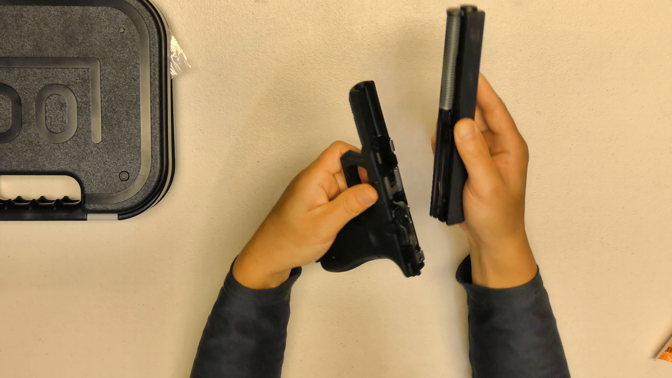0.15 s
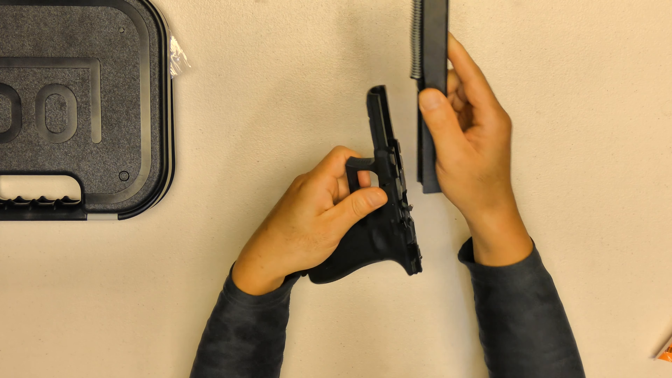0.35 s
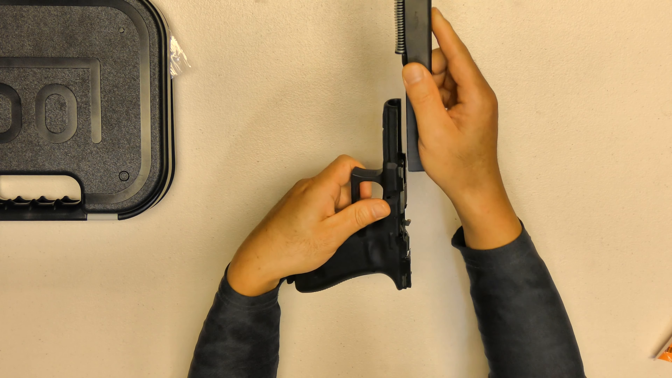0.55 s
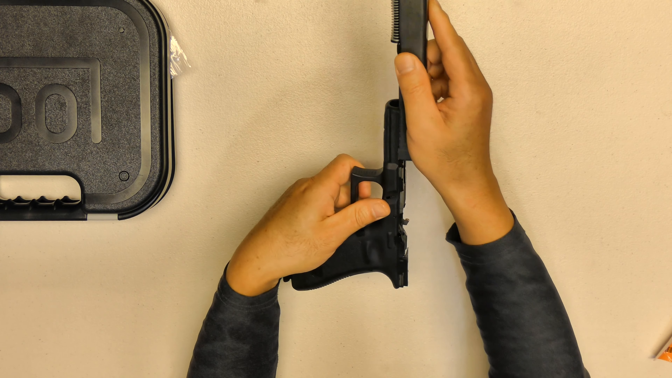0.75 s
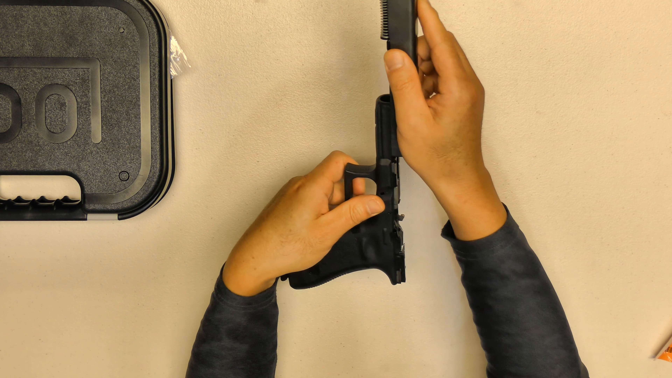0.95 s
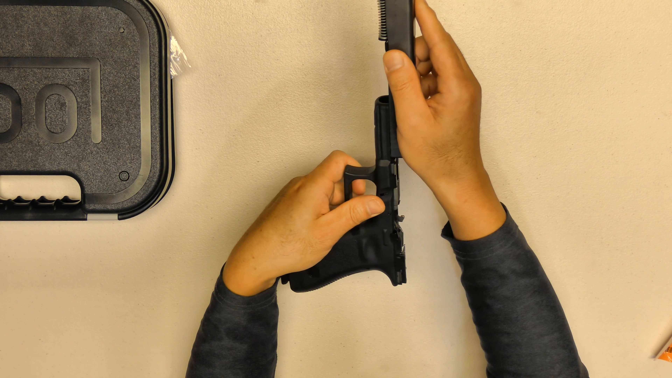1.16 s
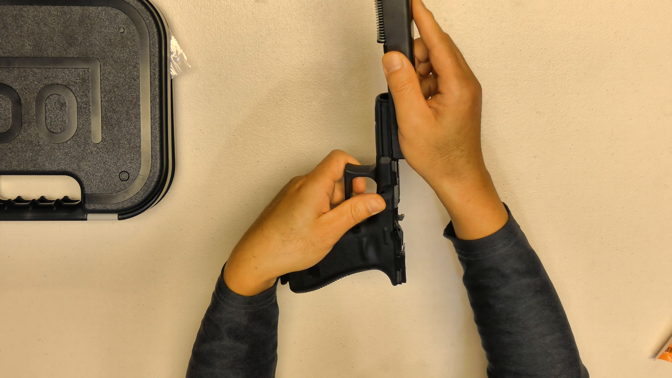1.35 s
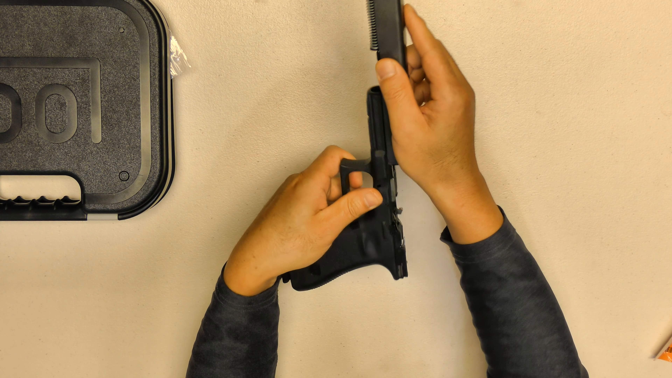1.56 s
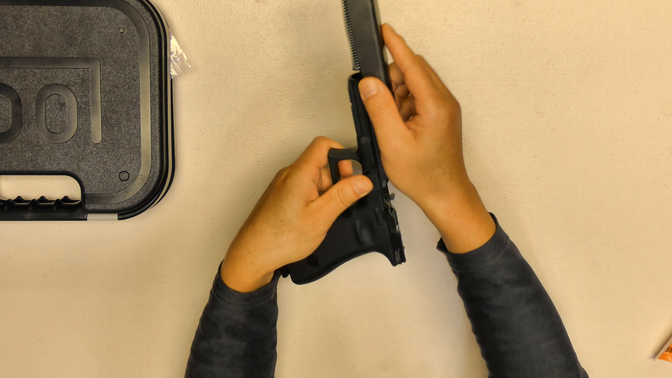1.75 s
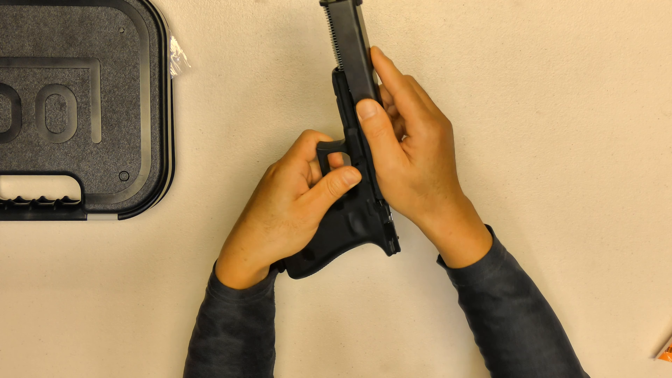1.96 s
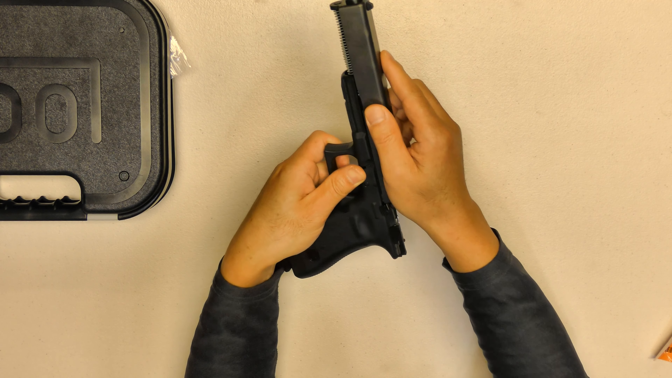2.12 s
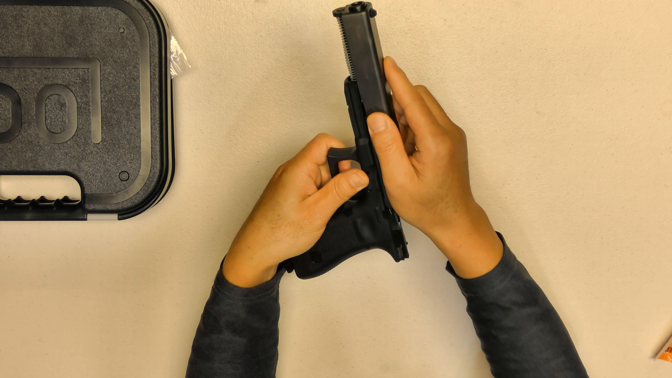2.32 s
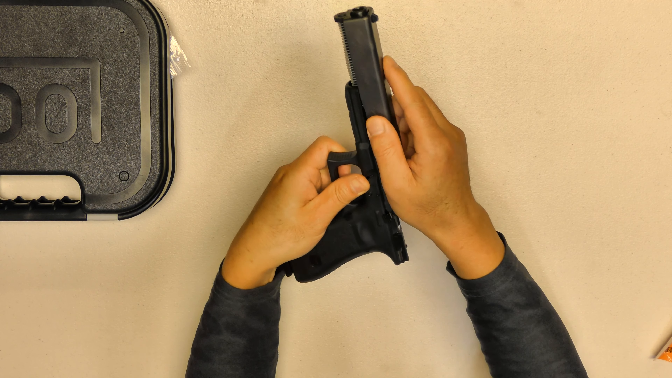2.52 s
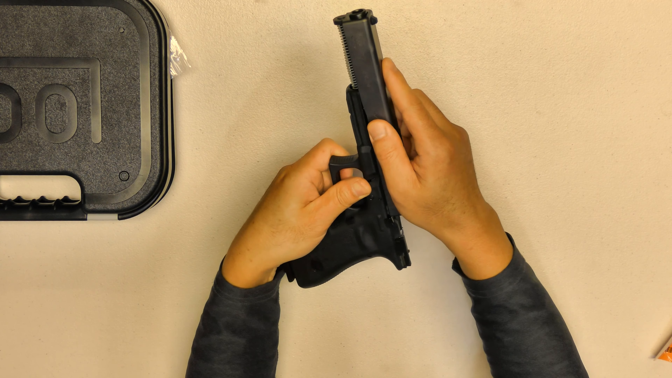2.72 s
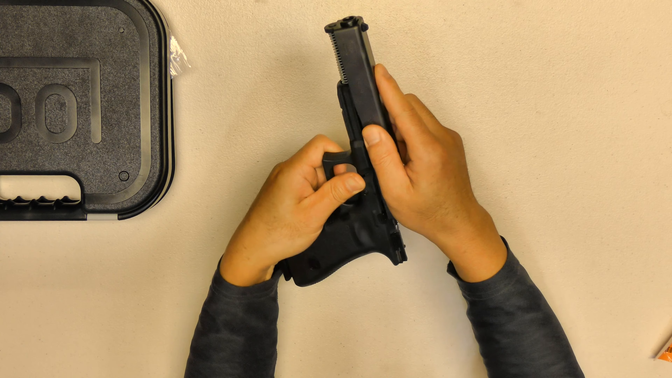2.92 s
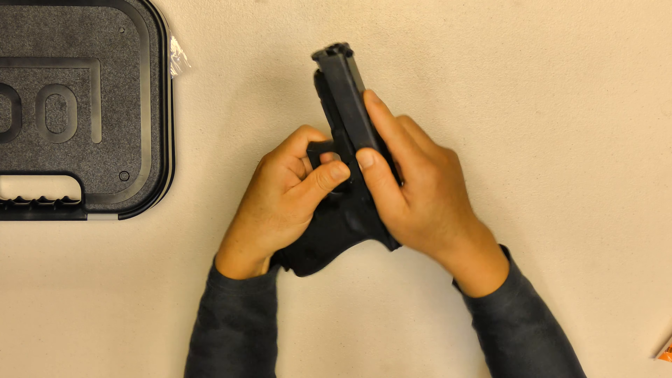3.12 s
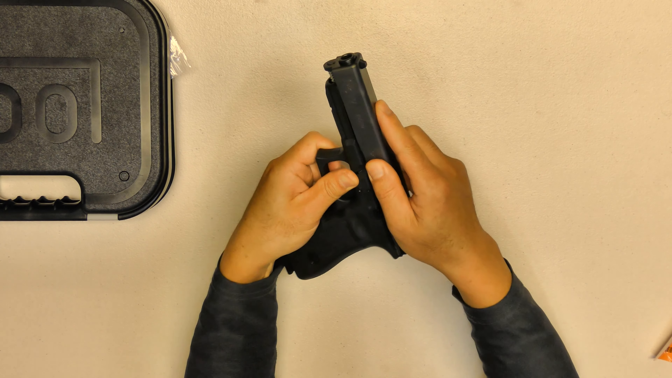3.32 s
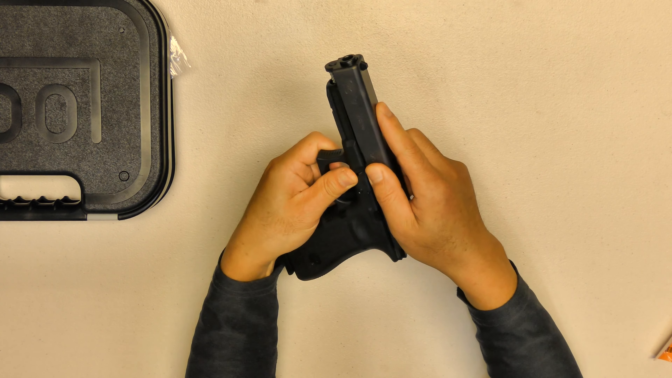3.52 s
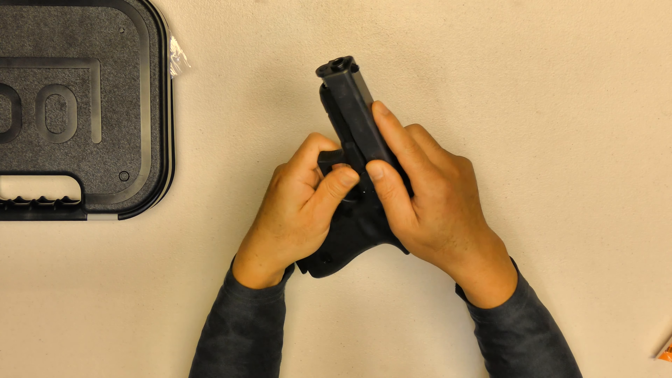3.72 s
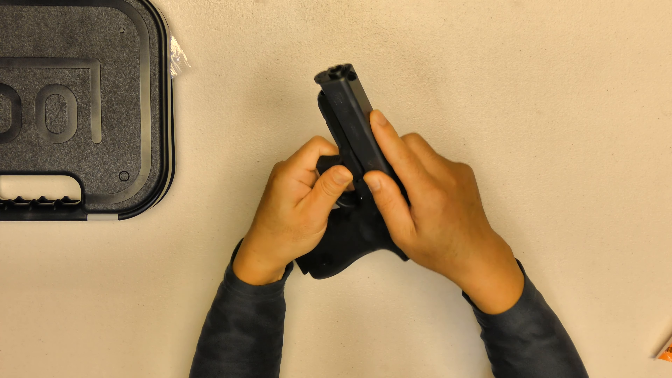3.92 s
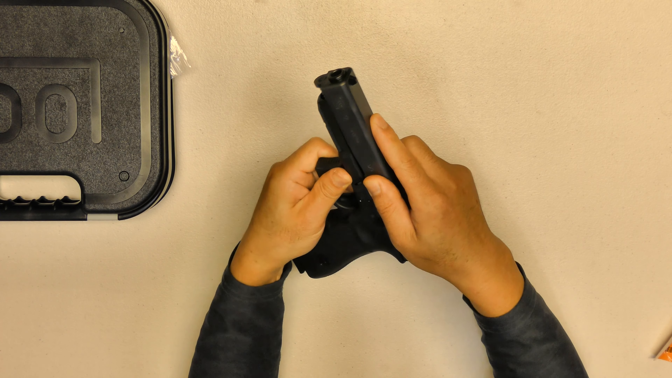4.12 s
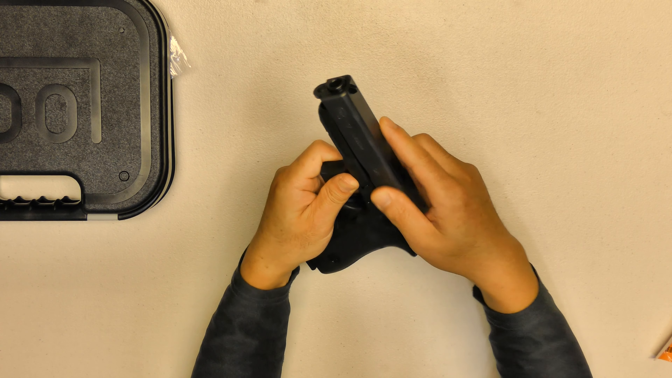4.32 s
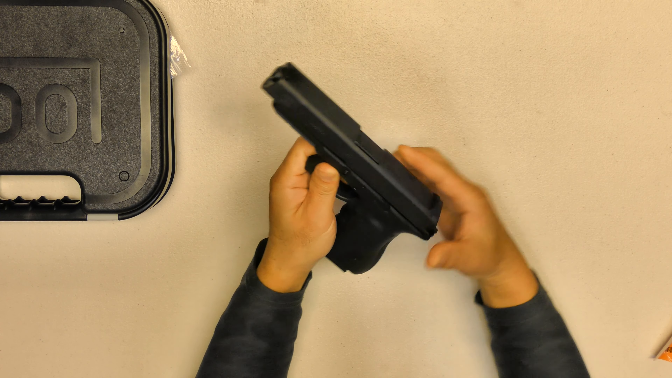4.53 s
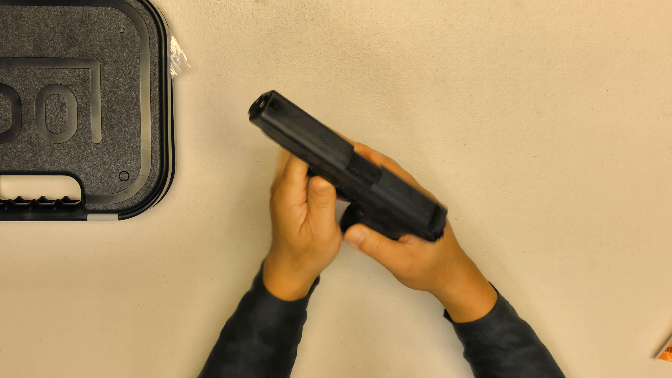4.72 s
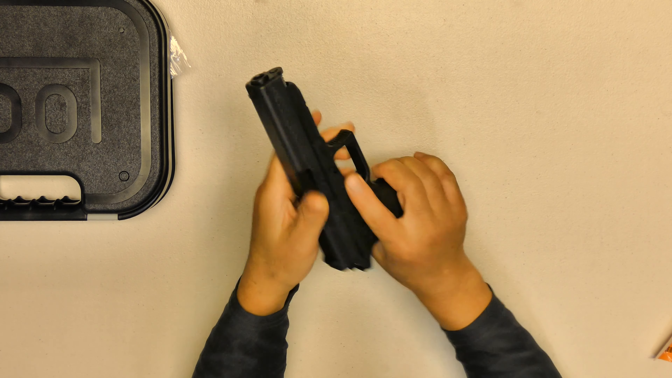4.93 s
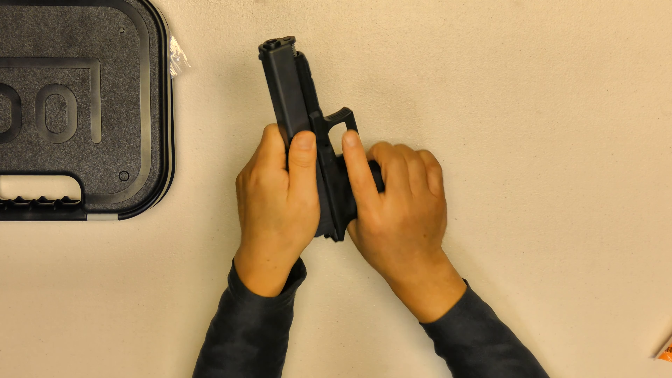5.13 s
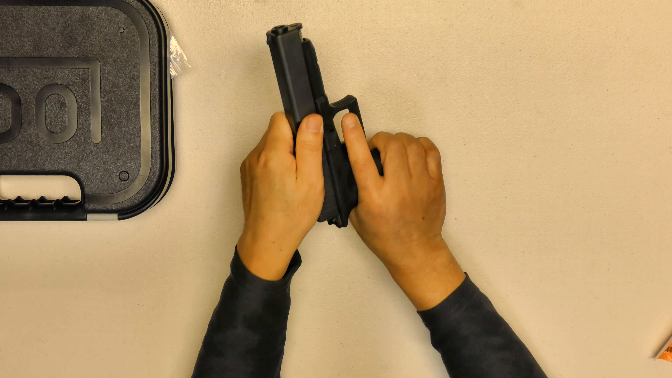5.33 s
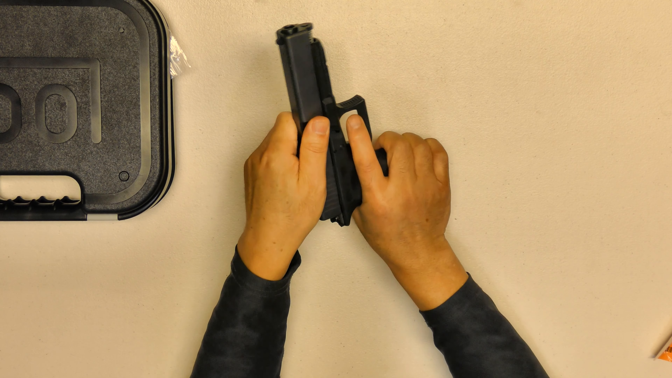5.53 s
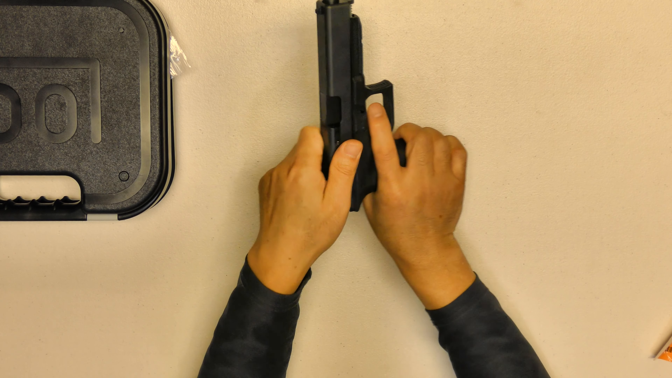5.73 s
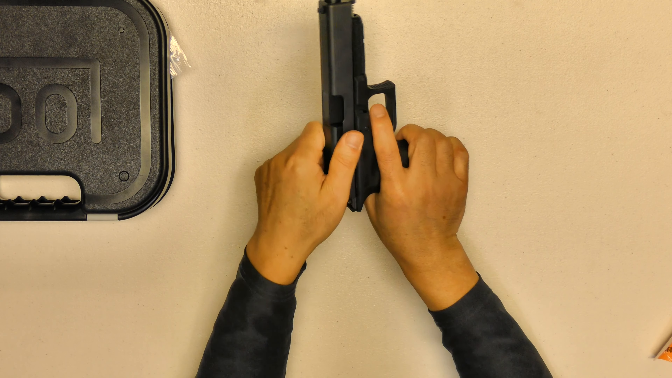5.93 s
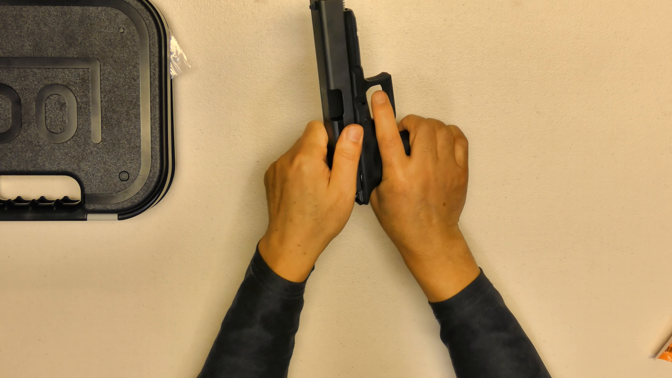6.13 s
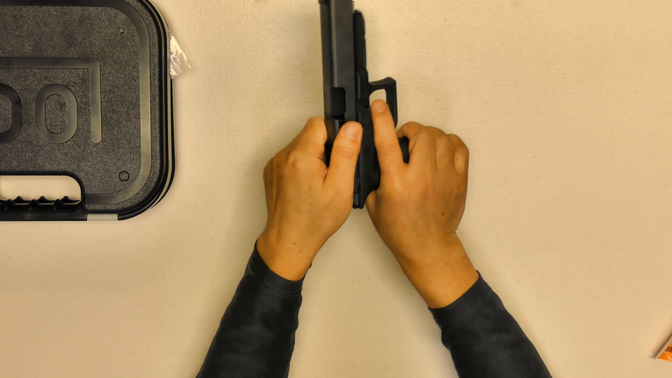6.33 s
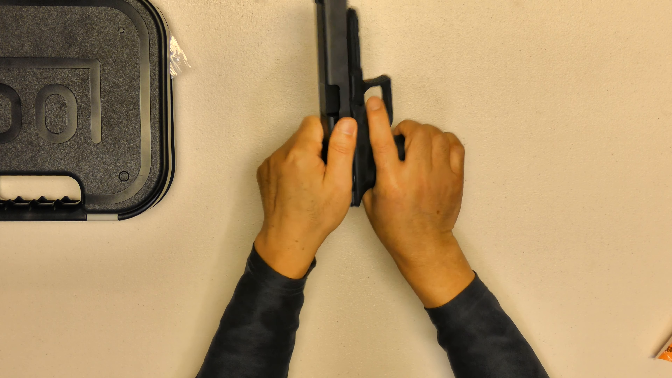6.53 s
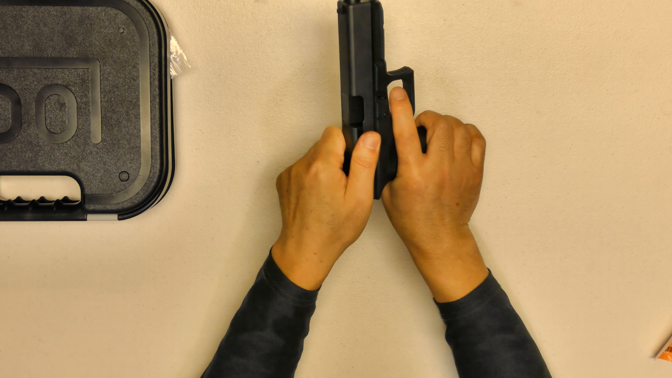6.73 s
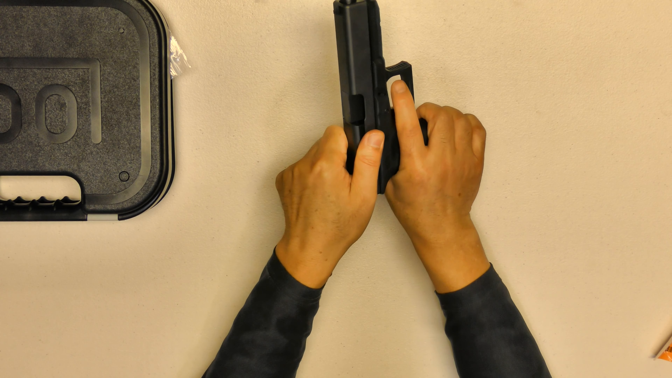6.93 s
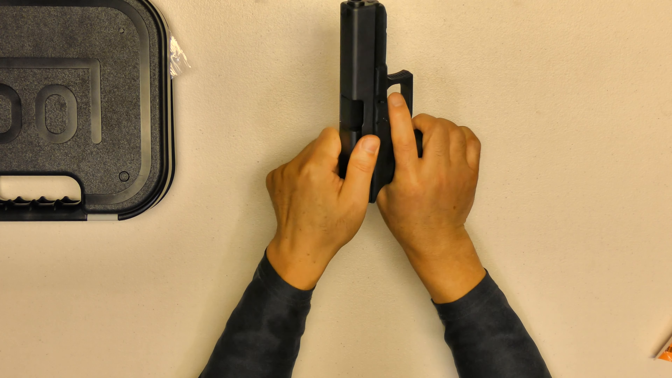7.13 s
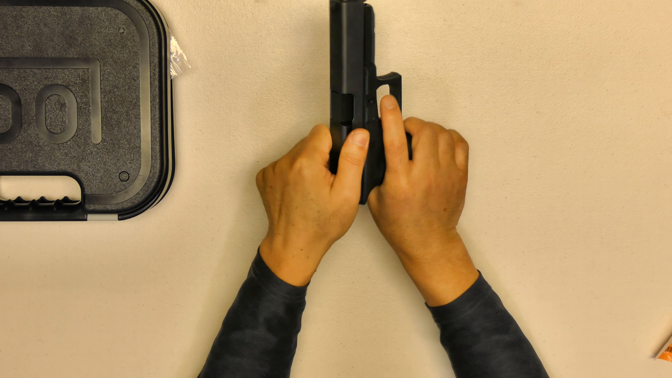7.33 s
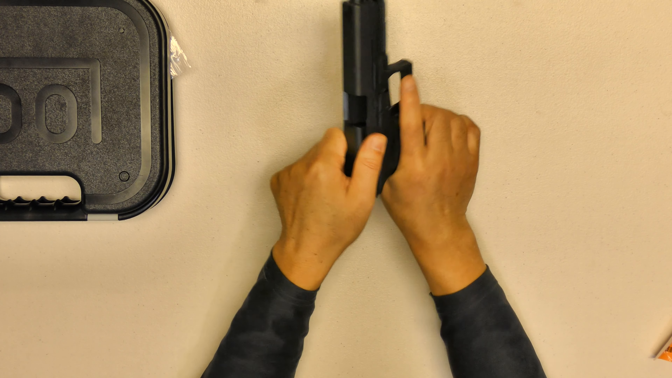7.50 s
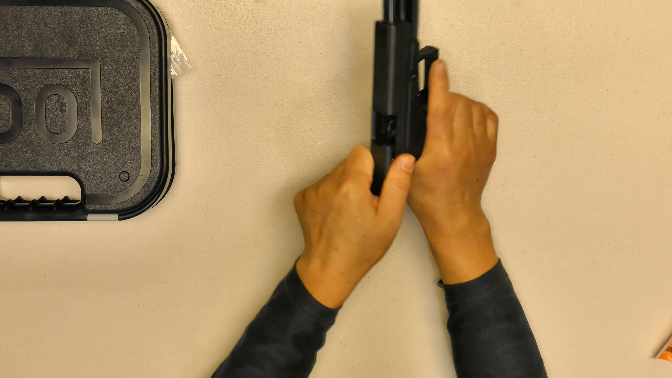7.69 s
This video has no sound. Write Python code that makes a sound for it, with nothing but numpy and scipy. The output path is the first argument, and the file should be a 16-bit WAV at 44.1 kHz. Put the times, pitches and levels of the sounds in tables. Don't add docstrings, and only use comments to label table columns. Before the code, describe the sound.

Pistol slide fitted onto its frame: small metallic clicks and scrapes, a loud double clack home, quiet handling, then two hard racking clacks in a room.

```python
import sys
import numpy as np
from scipy import signal
from scipy.fft import rfft, irfft
from scipy.io import wavfile
from scipy.ndimage import uniform_filter1d

SR = 44100
rng = np.random.default_rng(int(sys.argv[2]) if len(sys.argv) > 2 else 0)


def to_linear_factor(level_db):
    exponent = np.asarray(level_db, float) / 20
    return 10 ** exponent


def digitize_waveform(pressure):
    field = np.atleast_2d(pressure).T
    bounded = np.clip(field, -1, 1)
    quanta = np.round(bounded * 32767).astype(np.int16)
    wavfile.write(sys.argv[1], SR, quanta)


N = 342216

# pitch [Hz], width [Hz], level [dB].
STEEL_MODES = [(5690, 900, -5.5), (6810, 1000, -2.5), (7850, 1260, -3), (8750, 700, -1), (9600, 1300, -3.5),
               (10570, 570, -3), (11660, 2300, -4.5), (14800, 2600, -6.5)]
# frequency [Hz], likeness [-1 to 1].
HUSH_LIKENESS = [(60, 0.43), (180, 0.22), (550, 0.43), (1650, 0.428), (4970, 0.36), (7200, 0.76),
                 (11000, 0.82), (15000, 0.29)]


def evened(x):
    return x / np.sqrt(np.mean(x ** 2) + 1e-20)


def read(points, hz):
    f, value = np.transpose(points)
    return np.interp(np.log(hz + 1), np.log(f + 1), value)


def add(mix, s, sound):
    part = mix[round(s * SR):][:len(sound)]
    part += sound[:len(part)]


def ring(x, modes, extra_db=0., wide=0.6):
    out = np.zeros(len(x))
    changes = np.outer(extra_db * np.ones(len(modes)), [0, 0, 1])
    for k, (hz, width, db) in enumerate(modes + changes):
        r = np.exp(-np.pi * width * wide / SR)
        pole = [1, -2 * r * np.cos(2 * np.pi * hz / SR), r * r]
        out += (-1) ** k * to_linear_factor(db) * np.sqrt(1 - r) * signal.lfilter([1, 0, -1], pole, x)
    return out


def pair(magnitude, same, size):
    a, b, c, d = rng.standard_normal((magnitude.shape[1], magnitude.shape[0], 4)).T
    same = np.clip(same, -1, 1)[:, None]
    left, own = a + 1j * b, c + 1j * d
    z = np.array([left, same * left + np.sqrt(1 - same ** 2) * own])
    return signal.istft(z * magnitude, nperseg=size, noverlap=size * 3 // 4)[1]


def hush():
    # frequency [Hz], level [dB per Hz].
    hiss_colour = [(15, -53.5), (25, -19), (90, -3.5), (114, -3), (245, -6), (358, -11.5), (445, -13),
                   (584, -32), (1180, -17), (1280, -18), (1550, -19.5), (5720, -35.5), (12900, -25.5),
                   (15750, -28), (16050, -59.5)]
    hz = np.fft.rfftfreq(1024, 1 / SR)
    patches = rng.standard_normal((N // 256 + 5, 513)).T
    patches = evened(uniform_filter1d(uniform_filter1d(patches, 10, 0), 12, 1))
    colour = to_linear_factor(read(hiss_colour, hz)[:, None] + 0.81 * patches)
    return to_linear_factor(-63) * evened(pair(colour, read(HUSH_LIKENESS, hz), size=1024)[:, :N])


def rustle():
    # time [s], level [dB].
    busy = [(0.0, -63), (0.97, -62), (1.45, -64), (2.12, -54), (2.55, -71.5), (2.85, -62.5), (3.35, -56),
            (3.41, -48), (3.8, -61.5), (4.3, -63), (4.9, -62), (6.4, -64), (6.811, -53.5), (7.43, -63.5),
            (7.56, -54), (7.76, -62)]
    # frequency [Hz], level [dB per Hz].
    skin_colour = [(470, -29.5), (800, -7.5), (955, -15), (1120, -12.5), (1220, -8), (1620, -11),
                   (1890, -4), (2090, -14.5), (2260, -8), (3220, -13.5), (6000, -26.5), (7800, -57),
                   (13200, -120)]
    # pitch [Hz], width [Hz], level [dB].
    fan = [(967, 57, -9.5), (1784, 35, -4), (2200, 61, -6)]
    hz, frames = np.fft.rfftfreq(256, 1 / SR), N // 64 + 5
    flicker = evened(uniform_filter1d(rng.standard_normal(frames), 5))
    colour = to_linear_factor(read(skin_colour, hz)[:, None] + 2.0 * flicker)
    z = evened(pair(colour, read(HUSH_LIKENESS, hz), size=256)[:, :N])
    z += to_linear_factor(-6.5) * evened(ring(rng.standard_normal(N), fan))
    s, db = np.transpose(busy)
    return to_linear_factor(np.interp(np.arange(N) / SR, s, db) - 2.5) * z


def blows():
    # start [s], strength [dB], frame pitch [Hz], knock [dB].
    ticks = [(0.347, -46, 2730, -28), (0.634, -57.5, 1850, 2.5), (0.71, -40.5, 2340, -7),
             (0.997, -39, 2270, -11.5), (1.126, -44, 2200, -5.5), (1.402, -55, 2970, -14),
             (3.145, -53, 2460, -39), (3.8345, -51, 2000, -0.5), (3.854, -57.5, 2650, 2),
             (3.899, -62, 2070, 5.5), (4.385, -55.5, 2105, -13), (4.5351, -46, 2370, -26),
             (4.5742, -44.5, 2350, -17.5), (4.7, -46, 1930, -27), (4.866, -40, 2110, -15),
             (4.9371, -40.5, 2410, -34), (4.938, -42, 4400, -31), (4.81, -51, 3400, -25),
             (5.26, -52, 3000, -24.5), (5.332, -49.5, 2002, -3), (6.4106, -35, 2670, -11.5),
             (6.4668, -44, 2080, -11), (6.624, -34.5, 2650, -9), (7.15, -57.5, 1900, 8.5),
             (7.4834, -18, 3130, -25), (7.489, -28.5, 1900, 6), (7.6142, -20.5, 1830, 9)]
    # start [s], strength [dB], frame pitch [Hz], steel [dB], rattle [ms].
    fitting = [(0.852, -25.5, 2800, -14, 3.7), (1.2965, -41.5, 2470, -27, 5),
               (1.4245, -18.5, 3100, -16.5, 3.8), (1.5693, -18.5, 2630, -21, 3.4),
               (1.5767, -19.5, 2800, -13, 3.8), (1.589, -23.5, 2660, -18, 4.9),
               (1.688, -27.5, 2640, -14, 5.9), (1.879, -38.5, 2300, -25.5, 6.7), (1.918, -54, 2300, -19, 5),
               (1.941, -36, 2200, -10, 3.3), (2.026, -20, 3930, -3, 3.1), (2.0297, -16, 2000, -7, 4.4),
               (2.0388, -23, 2900, -8, 4.3), (2.0455, -20, 2800, -5, 3.7), (2.0503, -17.5, 2300, -17, 2.4),
               (2.0565, -26.5, 2590, -23.5, 3.9), (2.7301, -25.5, 2100, -24.5, 2.7),
               (2.8951, -43, 2210, -16.5, 6.9), (2.905, -35, 2300, -13, 3.3),
               (2.9133, -28, 2480, -4.5, 5.3), (2.9176, -26, 3600, -7.5, 3.6), (2.931, -34, 2300, -13, 2.9)]
    # start [s], strength [dB], frame pitch [Hz], steel [dB], rattle [ms].
    clacks = [(3.1725, -25.5, 2970, 2.5, 4.7), (3.177, -27, 2000, -14, 2.8), (3.1837, -18, 3330, -9, 13),
              (3.1952, -4, 2400, -7.5, 5.8), (3.2, -6, 2060, -14, 2.8), (3.2107, -17, 2470, 2, 6.6),
              (3.2167, -8.5, 2200, -16, 4.8), (3.2236, -3.5, 2530, 1, 2.8), (3.2262, -4, 2400, -7.5, 1.9),
              (3.236, -21.5, 3000, -11.5, 2.2), (4.415, -51, 2123, -4, 4.6), (5.687, -52, 1920, 2, 3.5),
              (6.6445, -34.5, 2700, 1, 5.3), (6.6683, -8.5, 3060, -3, 3.2), (6.6743, -10.5, 3050, -13, 2.8),
              (6.6815, -15, 2000, 0, 3.1), (6.694, -12, 3100, -1.5, 5.5), (6.699, -16.5, 2540, 2, 4.3),
              (6.706, -18, 2990, -15.5, 3.8), (7.388, -34.5, 3060, 0, 2.6), (7.405, -36.5, 3700, -7, 4.9),
              (7.417, -34.5, 3100, -11, 6.3), (7.4745, -28, 3750, 1, 3.1), (7.482, -19, 2300, 2, 2.4),
              (7.6087, -19, 1500, -12, 8.1), (7.6138, -4, 3300, 7.5, 1.45), (7.617, -9.5, 1900, 3, 4.8),
              (7.6215, -12, 2460, -3, 2), (7.6374, -15, 3560, -8, 4.4), (7.649, -16, 3450, 7, 5.8),
              (7.656, -25, 3560, -2, 3)]
    rows = [(s, db, hz, -17.5, knock_db, 4.03, 3.5) for s, db, hz, knock_db in ticks]
    rows += [(s, db, hz, steel_db, -23, ms, 0.64) for s, db, hz, steel_db, ms in fitting]
    rows += [(s, db, hz, steel_db, -21, ms, 1) for s, db, hz, steel_db, ms in clacks]
    rows = np.array(sorted(rows))
    rebound = np.diff(rows[:, 0]) < .0065
    rows[1:, 4] += -11.5 * rebound
    return rows


def body_at(s):
    # pitch [Hz], width [Hz], level [dB].
    touched = [(620, 17, -6), (1500, 260, 2.5), (1900, 240, 7), (2300, 190, 4), (2700, 320, -2.5),
               (3250, 420, 4), (4090, 490, 2.5), (5040, 430, -3)]
    loose = [(660, 12, -11), (1293, 120, -3), (1754, 270, 4), (2200, 260, 8), (3150, 250, 5),
             (3580, 250, 0.5), (4150, 230, -2.5), (4590, 190, -7), (4930, 250, -5)]
    entered = [(677, 24, -8), (1055, 79, -8.5), (1850, 560, 4), (2340, 280, 3.5), (2590, 170, 0.5),
               (2900, 530, 2), (3470, 670, 3), (4960, 1500, -3)]
    rails = [(700, 36, -30.5), (1330, 80, -2), (1770, 1400, 3), (2110, 150, 6.5), (2300, 260, 2),
             (2940, 100, 2), (3670, 170, 3), (4750, 720, -16)]
    past_first = [(645, 60, -11.5), (1360, 54, -8), (1780, 210, 3), (2200, 260, 5.5), (2700, 390, 1.5),
                  (3130, 160, -0.5), (3555, 180, 1), (3710, 230, 4.5), (4780, 790, 0)]
    hung = [(1343, 38, -3), (1770, 300, -0.5), (2100, 300, 5.5), (2540, 410, 0.5), (2943, 450, -3.5),
            (3720, 450, -5)]
    seated = [(1137, 229, -7), (1380, 220, -3.5), (2000, 230, 1), (2265, 160, 0), (2650, 480, -0.5),
              (3290, 420, -5), (3483, 100, -3), (3813, 280, -1.5), (4870, 1100, -5)]
    home = [(966, 200, -9), (1385, 150, -3), (1930, 170, 3.5), (2300, 220, 1), (2650, 340, -2),
            (3060, 440, 0), (3450, 147, -3), (3765, 200, 1.5), (4570, 1400, -1.5)]
    held = [(1000, 360, 1.5), (1400, 250, 2.5), (1950, 550, 4), (2300, 350, 1.5), (2650, 360, -0.5),
            (3300, 580, 2), (3750, 300, 2.5), (4470, 850, -1)]
    racked = [(890, 510, -6), (1137, 830, -1.5), (1850, 430, 2), (2300, 730, -1.5), (2880, 390, 0.5),
              (3130, 650, 2), (3560, 460, 1), (3900, 550, -3), (4560, 2000, -5)]
    pulled = [(740, 240, -8.5), (1230, 270, -0.5), (1900, 200, 0.5), (2400, 350, -0.5), (3100, 650, 2),
              (3700, 220, -2), (4020, 310, -3.5), (5000, 600, -3.5)]
    back = [(1220, 770, -4), (1776, 250, 2.5), (2400, 200, -4.5), (2970, 340, -1), (3560, 300, 1),
            (4400, 370, -1), (5600, 370, -12)]
    stages = [(0, touched), (1.2, loose), (1.56, entered), (1.8, rails), (2.023, past_first), (2.7, hung),
              (2.88, seated), (3.1, home), (3.8, held), (6.6, racked), (7.3, pulled), (7.6, back)]
    return [modes for start, modes in stages if start <= s][-1]


def near(modes, hz, fall_db, most_db):
    return -np.minimum(fall_db * np.log2(np.array(modes)[:, :1] / hz) ** 2, most_db)


def struck(db, knee_db=-21, lift=0.57):
    return db + lift * np.maximum(db - knee_db, 0)


def whitened(x, envelope):
    for _ in range(3):
        z = rfft(x * envelope)
        x = irfft(z / (abs(z) + 1e-9), len(x))
        x = x / np.sqrt(uniform_filter1d(x ** 2, size=41) + 1e-12)
    return x * envelope


def steel_at(s):
    # pitch [Hz], width [Hz], level [dB].
    sprung = [(5900, 700, -2), (6900, 710, -2.5), (7550, 1100, -4), (8460, 800, -0.5), (9770, 1200, 0),
              (10700, 700, 3), (11800, 1800, 0.5), (13850, 2500, -1.5)]
    # pitch [Hz], width [Hz], level [dB].
    slammed = [(5230, 770, -6), (6270, 640, -3), (7480, 700, -2), (8680, 800, -0.5), (9100, 900, -3.5),
               (10200, 530, -1), (11500, 1300, -3), (13500, 2800, -6.5)]
    # time [s], tilt [dB per octave].
    brightness = [(1.4, -3.5), (2.0, -1), (3.2, 3.5), (6.7, 2.5), (7.48, -3), (7.6, 2)]
    steel = sprung if s > 7.6 else slammed if 3.1 < s < 3.8 else STEEL_MODES
    tilt_db = np.interp(s, *np.transpose(brightness)) * np.log2(np.array(steel)[:, 0] / 9000)
    return steel, tilt_db


def click(row, chance, grit):
    # pitch [Hz], width [Hz], level [dB].
    grip = [(300, 380, -5.5), (490, 214, 1.5), (672.3, 1000, 2.5), (1025, 1000, 4)]
    s, db, hz, steel_db, knock_db, ms, focus = row
    t, end = np.arange(len(grit)) / SR, max(ms, .3) / 1000
    chatter = whitened(grit, np.exp(-(t / end) ** 3 / 2 - 0.6 * t / end))
    contact = chatter * (1 + 2.0 * np.exp(-t / 0.000081))
    damp = np.exp(-np.maximum(t - end, 0) / .006)
    body = body_at(s)
    steel, tilt_db = steel_at(s)
    near_db = near(body, hz, fall_db=7.0, most_db=5.5)[:, 0] * focus
    # modes, change per mode in dB, level in dB, blur
    parts = ((body, near_db, 0, 3), (steel, chance + tilt_db, steel_db, 25), (grip, 0, knock_db, 3))
    front, power = 0, 0
    for modes, extra_db, part_db, blur in parts:
        part = ring(contact * np.exp(-t * blur / 0.23), modes, extra_db) * damp
        part *= to_linear_factor(struck(db) + part_db) / np.abs(part).max()
        front = front + part
        response = ring(1. * (t == 0), modes, 0.79 * extra_db, wide=1.02)
        colour = uniform_filter1d(abs(rfft(response)) ** 2, blur)
        carries = to_linear_factor(2 * -4 * (modes is grip))
        power = power + carries * np.sum(part ** 2) * colour / colour.mean()
    crack = np.diff(grit, prepend=0) * np.exp(-t / 0.00041)
    front = front + to_linear_factor(struck(db) + steel_db - 2.5) * crack / np.abs(crack).max()
    late = 30 + 400 * np.abs(uniform_filter1d(grit[:len(power)], size=15))
    spread = irfft(np.sqrt(power) * np.exp(-2j * np.pi * np.cumsum(late) / len(grit)))
    return s, front, spread


def thin_ring(s, db, hz, t60):
    t = np.arange(0, .3, 1 / SR)
    return s, to_linear_factor(db - 60 * t / t60) * np.minimum(t / .0012, 1) * np.sin(2 * np.pi * hz * t)


def run_up(length):
    t = np.arange(0, length, 1 / SR)
    return -67 * (length - t) - 26 * np.exp(-t / 0.018)


def ease_off(length):
    t, rise_s, ease_db = np.arange(0, length, 1 / SR), 0.0062, 9
    return np.interp(t, [0, rise_s, max(length, 2 * rise_s)], [-ease_db, 0, -ease_db])


def arch(length):
    return -20 * np.linspace(-1, 1, round(length * SR)) ** 2


def uneven_slips(size, rate, spread_db, most):
    strength = to_linear_factor(spread_db * np.minimum(rng.exponential(1, size), most))
    return rng.standard_normal(size) * strength * (rng.random(size) < rate / SR)


def stroke(row, shape):
    s, length, db, steel_db, hz = row
    pressure_db = db + shape(length)
    size = len(pressure_db)
    slips = uneven_slips(size, 4000, 2.0, 3)
    body = body_at(s)
    weight = to_linear_factor(near(body, hz, fall_db=22.5, most_db=8.5))
    frame = 0
    for k, (w, mode) in enumerate(zip(weight, body)):
        frame = frame + w * (-1) ** k * ring(slips, [mode], wide=0.94)
    tilt_db = 2.0 * np.log2(np.array(STEEL_MODES)[:, 0] / 9000)
    steel = evened(ring(slips, STEEL_MODES, tilt_db, wide=1.1))
    rub = evened(frame) + to_linear_factor(steel_db) * steel
    return s, to_linear_factor(pressure_db - 4.0) * rub * signal.windows.tukey(size, .15)


def sing(s, length, db, first_hz, last_hz):
    size = round(length * SR)
    turn = np.exp(2j * np.pi * np.cumsum(np.linspace(first_hz, last_hz, size)) / SR)
    r = np.exp(-np.pi * 220 / SR)
    slips = uneven_slips(size, 1500, 3.0, 2)
    slow = signal.lfilter([1], [1, -r], signal.lfilter([1], [1, -r], slips / turn))
    return s, to_linear_factor(db) * evened((turn * slow).real) * signal.windows.tukey(size, .12)


def swell(u, top):
    return -21 * np.where(u < top, 1 - u / top, (u - top) / (1 - top)) ** 2


def shove(s, length, db, deep_db):
    # pitch [Hz], width [Hz], level [dB].
    panel = [(55.2, 16, -4), (125.7, 8.5, -3.5), (190, 27, -5.5), (307.4, 56, -11)]
    t = np.arange(0, length, 1 / SR)
    u, push = t / length, rng.standard_normal(len(t))
    thud, drone = [np.sin(2 * np.pi * hz * t + push[0]) for hz, _, _ in panel[:2]]
    deep = to_linear_factor(deep_db + swell(u, 0.2)) * (thud + 0.4 * evened(ring(push, panel[:1])))
    hum = to_linear_factor(swell(u, 0.38)) * (1.01 * drone + 0.66 * evened(ring(push, panel[1:])))
    return s, to_linear_factor(db) * (deep + hum) * signal.windows.tukey(len(u), .2)


def room(x):
    # frequency [Hz], time to fall 60 dB [s].
    die_away = [(120, 0.97), (400, 0.57), (1000, 0.46), (2500, 0.71), (6000, 0.57), (10000, 0.49),
                (15000, 0.23)]
    # frequency [Hz], level [dB].
    echo_colour = [(100, 10), (500, 0), (2000, -3.5), (6000, 0), (11000, -2.5), (16000, 6.5)]
    # frequency [Hz], likeness [-1 to 1].
    likeness = [(60, -0.14), (180, 0.62), (550, 0.37), (1650, 0.48), (4970, 0.8), (15000, 0.78)]
    hz, t = np.fft.rfftfreq(256, 1 / SR), np.arange(SR // 80) * 64 / SR
    builds = np.clip((t - .002) / 0.0019, 0, 1)
    shape = to_linear_factor(read(echo_colour, hz)[:, None] - 60 * t / read(die_away, hz)[:, None]) * builds
    out, turn = np.zeros((2, N)), np.arange(N) / SR * 2 * np.pi / .017
    for k in range(3):
        tail = pair(shape, read(likeness, hz), size=256)
        share = np.sqrt(2 / 3) * np.cos(turn + k * 2 * np.pi / 3)
        out += signal.fftconvolve((x * share)[None], tail / np.linalg.norm(tail[0]), axes=1)[:, :N]
    return out


def ports(x):
    # frequency [Hz], level [dB].
    response = [(0, 0.5), (13000, -1.5), (15000, -7), (15750, -9), (16100, -20.5), (22050, -60.5)]
    # frequency [Hz], left minus right [dB].
    lean = [(60, 0.65), (180, 0.5), (550, -0.82), (1650, -0.73), (4970, -0.82), (15000, 0.0)]
    hz = np.linspace(0, SR / 2, 257)
    taps = [signal.firwin2(255, hz, to_linear_factor(read(response, hz) + side * read(lean, hz)), fs=SR)
            for side in (.5, -.5)]
    return signal.oaconvolve(x, taps, "same", axes=1)


def scene():
    # start [s], level [dB], pitch [Hz], time to fall 60 dB [s].
    rings = [(0.634, -57, 300, 0.11), (0.853, -50, 2000, .1), (0.853, -47, 3320, .1),
             (0.853, -54, 4300, .08), (1.4253, -30, 3150, .04), (2.03, -39, 1395, .25),
             (2.7305, -46, 1360, .12), (2.731, -34, 2130, 0.022), (2.918, -34, 3700, .03),
             (4.7, -53, 1900, .08), (7.475, -37, 3700, .05), (7.483, -27, 2046, 0.047),
             (7.4845, -23, 3050, 0.059), (7.6375, -12, 3560, 0.069)]
    # start [s], length [s], final pressure [dB], steel [dB], frame pitch [Hz].
    runs = [
        (1.392, 0.029, -43, -20, 3100),
        (1.871, 0.077, -49, -13, 2254),
        (1.939, 0.0857, -42, -9, 2200),
        (2.886, 0.029, -38.5, -12.5, 2306),
        (3.128, 0.065, -37, -15, 2130),
        (6.649, 0.016, -21, -13, 2980),
        (7.453, 0.014, -42, -6, 3470),
    ]
    # start [s], length [s], peak pressure [dB], steel [dB], frame pitch [Hz].
    drags = [
        (1.599, 0.04, -45, -18, 2450),
        (1.71, 0.25, -47.5, -15.5, 2530),
        (2.922, 0.037, -36.5, -14, 2200),
        (3.179, 0.021, -27, -1, 2100),
        (4.943, 0.29, -62.5, -5.5, 3900),
        (7.062, 0.277, -63.5, -22, 900),
        (7.376, 0.091, -45.5, -10.5, 2700),
        (7.643, 0.11, -20.5, -0.5, 3580),
    ]
    # start [s], length [s], peak pressure [dB], steel [dB], frame pitch [Hz].
    brushes = [
        (1.657, 0.058, -36, -20, 2550),
        (4.74, 0.11, -55, -1.5, 2830),
        (5.215, 0.065, -51, -11, 1950),
        (5.717, 0.098, -66.5, 4, 1950),
        (4.843, 0.06, -53.5, -6, 2200),
        (6.406, 0.1, -49.5, -12.5, 2320),
    ]
    # start [s], length [s], level [dB], first pitch [Hz], last pitch [Hz].
    sings = [
        (1.701, 0.11, -51.5, 2730, 2420),
        (1.789, 0.14, -54.5, 2300, 2050),
        (1.94, 0.088, -51.5, 2180, 1840),
        (1.846, 0.077, -61.5, 3450, 3400),
        (1.94, 0.091, -54, 3480, 3560),
        (1.938, 0.094, -58, 3200, 3070),
    ]
    # start [s], length [s], level [dB], lowest mode [dB].
    shoves = [
        (2.019, 0.34, -67.5, -2),
        (2.897, 0.19, -66, 4),
        (3.183, 0.39, -67, -9),
        (3.8, 0.33, -63.5, -3),
        (5.2, 0.22, -63.5, -5.5),
        (6.401, 0.1, -61.5, -5),
        (6.655, 0.24, -42.5, -6),
        (7.103, 0.14, -64, -5),
        (7.469, 0.23, -51.5, -7),
        (7.62, 0.24, -56, -3),
    ]
    front, around, table, other = np.zeros((4, N))
    hits = blows()
    draws = rng.standard_normal((len(hits), 8 + 1300))
    for row, draw in zip(hits, draws):
        s, direct, spread = click(row, draw[:8], draw[8:])
        add(front, s, direct)
        add(around, s, spread)
    for rows, shape in ((runs, run_up), (drags, ease_off), (brushes, arch)):
        for row in rows:
            s, rub = stroke(row, shape)
            add(front, s, rub)
            add(around, s, rub)
    for s, sound in [sing(*row) for row in sings] + [thin_ring(*row) for row in rings]:
        add(front, s, sound)
        add(around, s, to_linear_factor(-7.5) * sound)
    for row in shoves:
        add(table, *shove(*row))
        add(other, *shove(*row))
    low = np.array([to_linear_factor(3.5) * table, to_linear_factor(1.5) * (0.6 * table + 0.8 * other)])
    return ports(front + to_linear_factor(-0.5) * room(around) + rustle()) + low


def levelled(x):
    smooth_s, knee_db, share = 0.04, -30, .6
    r = np.exp(-1 / (smooth_s * SR))
    power = (x ** 2).mean(0)
    for _ in range(2):
        power = signal.lfilter([1 - r], [1, -r], power)
    power_db = 10 * np.log10(power + 1e-12)
    return x / to_linear_factor(share * np.maximum(power_db - knee_db, 0))


def roll_off(x):
    return signal.sosfilt(signal.butter(12, 17020, fs=SR, output="sos"), x)


def record(dry):
    power_db = 10 * np.log10(abs(uniform_filter1d((dry ** 2).mean(0), size=300)) + 1e-12)
    climb = np.arange(N) * 160. / SR
    held_db = np.maximum.accumulate(power_db + climb) - climb
    over_db = np.maximum(held_db + 28, 0)
    ducked = dry / to_linear_factor(.52 * uniform_filter1d(over_db, size=100))
    return roll_off(levelled(ducked) + hush())


dry = scene()
out = record(dry)
digitize_waveform(out)
```